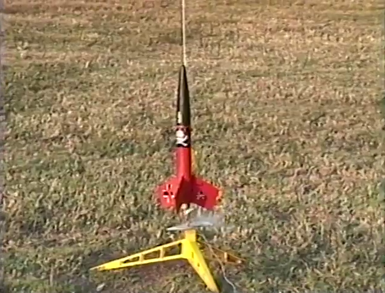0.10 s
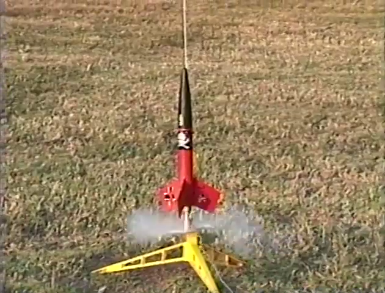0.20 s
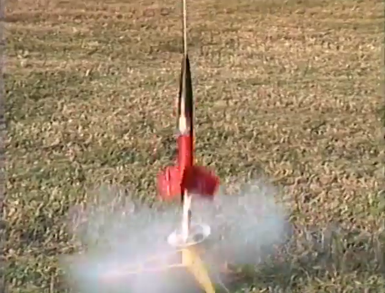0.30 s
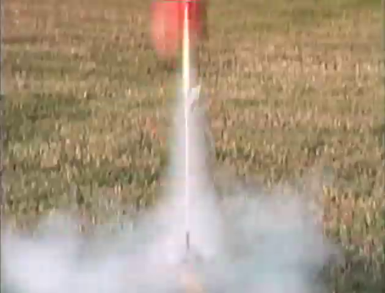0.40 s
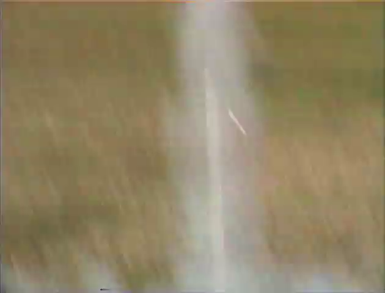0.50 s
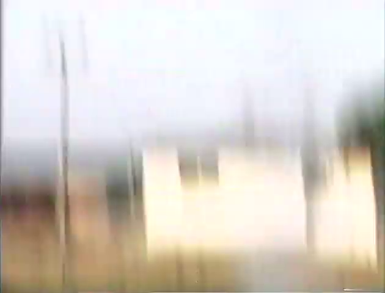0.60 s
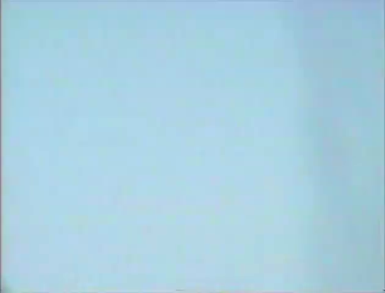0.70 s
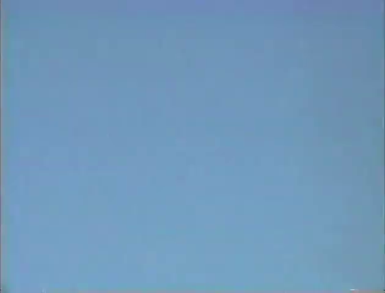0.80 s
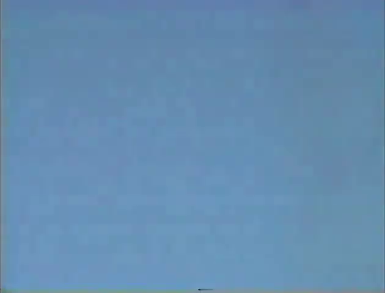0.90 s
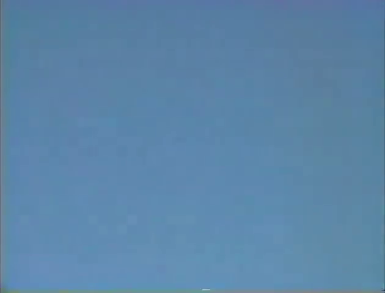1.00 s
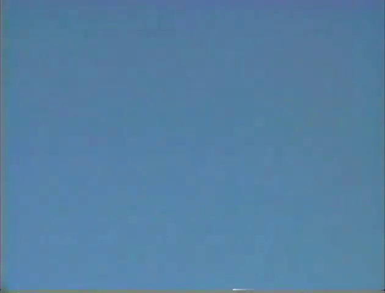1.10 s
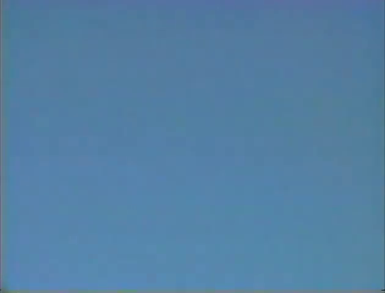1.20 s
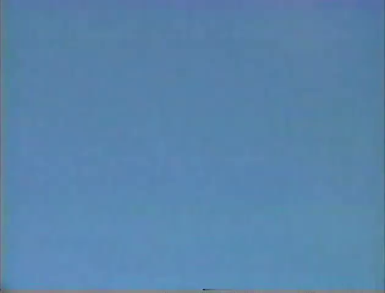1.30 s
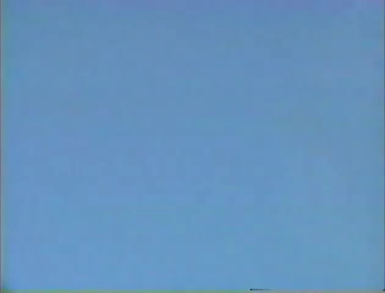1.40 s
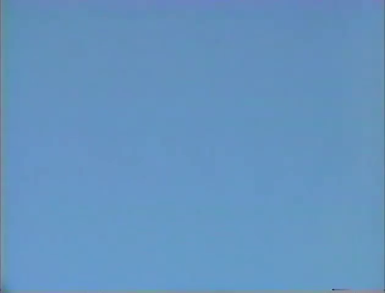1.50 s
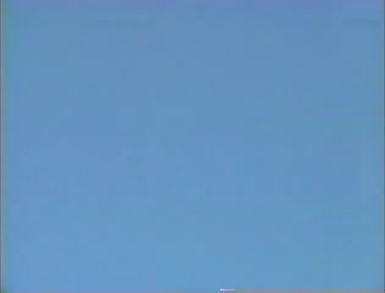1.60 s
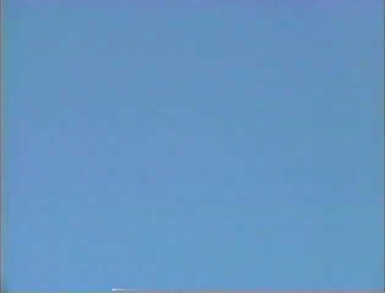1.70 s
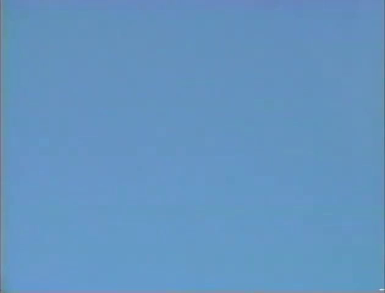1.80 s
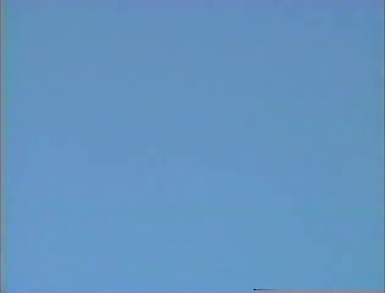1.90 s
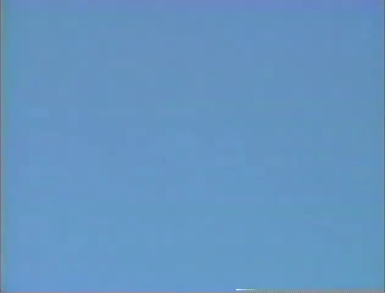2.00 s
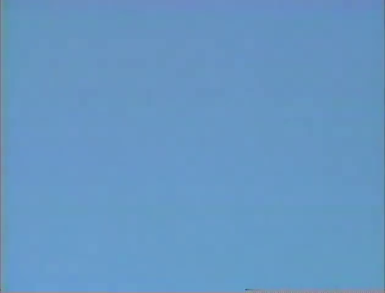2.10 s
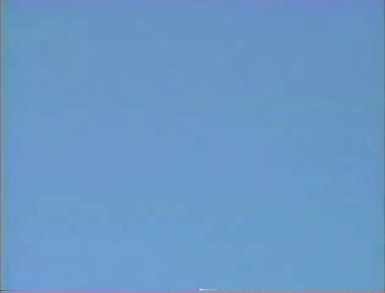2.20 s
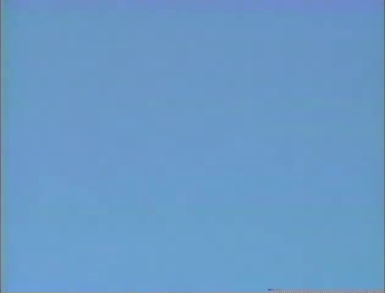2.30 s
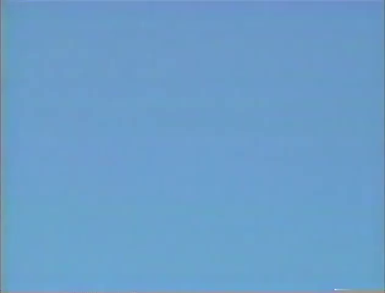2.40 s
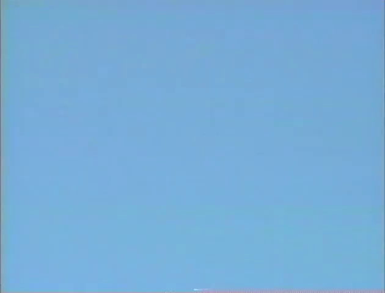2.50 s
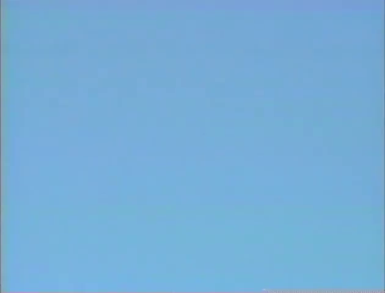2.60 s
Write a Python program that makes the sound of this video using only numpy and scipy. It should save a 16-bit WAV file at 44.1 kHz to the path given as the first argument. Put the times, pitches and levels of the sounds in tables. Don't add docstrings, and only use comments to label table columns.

```python
import sys
import numpy as np
from scipy import signal
from scipy.fft import rfft, irfft
from scipy.io import wavfile
from scipy.ndimage import uniform_filter1d

SR = 44100
rng = np.random.default_rng(int(sys.argv[2]) if len(sys.argv) > 2 else 0)


def wav_record(signal):
    frames = np.transpose(np.atleast_2d(signal))
    bounded = np.clip(frames, -1, 1)
    quanta = np.round(bounded * 32767).astype(np.int16)
    wavfile.write(sys.argv[1], SR, quanta)


def convert_level_to_amplitude(level_db):
    exponent = np.asarray(level_db, float) / 20
    return 10 ** exponent


N = 114660

# time in seconds, thrust as heard in dB, brightness from aim and height in dB,
# stereo spread in dB, body in dB.
BURN = [(0, -69.5, -11, 6, -1), (.105, -76, -13, 18, 2), (0.124, -51.5, -1.5, 3, 1.5),
        (.2, -37, -7.5, 2, -3), (0.306, -17.5, -10.5, 2.5, -5.5), (.325, -22.5, 0.5, 3, 0.5),
        (.365, -22, -0.5, 3, -5), (0.399, -21, -6.5, 4, 3), (.57, -22, -8, 4, 2), (.72, -22, -5, 4, 1),
        (.88, -24, -1, 6.5, -0.5), (1.15, -21.5, -9, 6, -2), (1.45, -24, -14, 7, 0),
        (2.001, -30, -14.5, 8, 2.5), (2.332, -33.5, -19.5, 8.5, 6), (2.369, -40.5, -20.5, 7, 11),
        (2.414, -58, -15, 24, 14), (2.46, -68.5, -14, 20, 9)]
THRUST, BRIGHTNESS, SPREAD, BODY = 1, 2, 3, 4

# frequency in Hz, level in dB per Hz.
JET_COLOUR = [(280, -28.5), (650, -11.5), (1300, -3), (3300, 5.5), (4300, -3.5), (9200, -4.5), (11000, -6),
              (15500, -11.5)]
JET_SIDE_COLOUR = [(250, -40), (1200, -31), (2300, -29), (3400, -20.5), (5000, -16), (9000, -18.5),
                   (12500, -20), (15500, -22.5)]

# place in Hz with the rocket ahead,
# place in Hz with it above, width in Hz, level in dB ahead, level in dB above.
NOTCHES = [(600, 1490, 153, 0.5, -2), (2160, 2144, 470, -12, -12), (4950, 4700, 980, -6.5, 1.4),
           (6200, 7010, 570, -25.5, -24), (11730, 10300, 460, -18.5, -5.5)]
NOTCHES_SIDE = [(2500, 2350, 350, -9, -9), (6200, 7000, 300, -8, -12), (11300, 11000, 300, -4, -6)]

# time in seconds, peak in dB, bluntness in Hz (higher is sharper).
CRACKS = [(0.3123, -10, 1250), (.3108, -18.5, 1600), (.3195, -26, 1210), (.36, -21, 1200),
          (.435, -21, 1110), (.55, -28, 1200), (.84, -18.5, 1500), (.870, -19.5, 1500), (.903, -16.5, 1500),
          (1.11, -27, 1500), (1.2789, -17.5, 1540), (1.5663, -20.5, 1510), (2.027, -28, 1500)]

# frequency in Hz, level in dB per Hz.
ECHO_COLOUR = [(150, 2), (400, 3), (1200, -9.5), (2200, -13), (3400, -10), (6500, -21), (10000, -28),
               (14000, -30)]

# time in seconds, level in dB.
POPS = [
    (2.4225, -28.5),
    (2.4288, -37.5),
    (2.496, -47.5),
]

# frequency in Hz, level in dB, time to fall by 60 dB in seconds.
POP_MODES = [(230, -12, .03), (470, -10, .01), (780, -2, .008), (2900, -1, .005), (4900, 5, .004),
             (6600, -8, .004), (9200, -5, .002), (12300, -5, .003), (14800, -10, .002)]

# multiple of the head rate, level in dB.
BUZZ = [(1, -59), (2, -51), (3, -44.5), (4, -53.5), (5, -55), (6, -53), (7, -68), (8, -70)]

# frequency in Hz, level in dB per Hz.
FIELD_COLOUR = [(15, -12.5), (25, -2.5), (103, -6), (468, -13.5), (796, -8.5), (2370, -33), (3180, -40.5),
                (13000, -46), (14500, -42)]


def rms_one(x):
    return x / np.sqrt(np.mean(x ** 2) + 1e-20)


def at_hz(points, hz):
    table_hz, table_db = np.array(points).T
    return np.interp(np.log(hz), np.log(table_hz), table_db)


def burn(column, s):
    rows = np.array(BURN)
    return np.interp(s, rows[:, 0], rows[:, column])


def seconds():
    return np.arange(N) / SR


def smooth(x, hz, kind="low"):
    return signal.sosfilt(signal.butter(2, hz, kind, fs=SR, output="sos"), x)


def balance(left_db, right_db):
    return convert_level_to_amplitude([[left_db], [right_db]])


def wide_noise(points):
    hz = np.maximum(np.fft.rfftfreq(N, 1 / SR), 20)
    return rms_one(irfft(rfft(rng.standard_normal((2, N))) * convert_level_to_amplitude(at_hz(points, hz)), N))


def all_around(pair):
    mid, side = pair
    return mid + side * convert_level_to_amplitude(-4) * [[1], [-1]]


def notch_db(table, hz, above):
    total = 0
    for ahead_hz, above_hz, width, ahead_db, above_db in table:
        total = total + ahead_db * (1 - above) * np.exp(-abs(hz - ahead_hz) / width)
        total = total + above_db * above * np.exp(-abs(hz - above_hz) / width)
    return total


def jet():
    frame = dict(nperseg=256, noverlap=192)
    sputter = convert_level_to_amplitude(1.0 * rms_one(smooth(rng.standard_normal(N), 370)))
    hz, s, (mid, other) = signal.stft(rng.standard_normal((2, N)) * sputter, SR, **frame)
    hz = np.maximum(hz, 1)[:, None]
    overhead_start_s, overhead_end_s = 0.51, 0.91
    above = np.clip((s - overhead_start_s) / (overhead_end_s - overhead_start_s), 0, 1)
    brightness = burn(BRIGHTNESS, s)

    bright_from_hz, bright_full_hz, body_below_hz = 4240, 7870, 2400
    top = np.clip((hz - bright_from_hz) / (bright_full_hz - bright_from_hz), 0, 1)
    body = 1 / (1 + (hz / body_below_hz) ** 6)
    edge_hz, edge_width_hz, edge_db_per_s, edge_from_s = 15400, 1200, -16, 0.67
    edge_shape = np.exp(-((hz - edge_hz) / edge_width_hz) ** 2)
    edge_db = edge_db_per_s * np.maximum(s - edge_from_s, 0) * edge_shape
    patches = uniform_filter1d(rng.standard_normal(mid.shape), size=16, axis=1)
    flicker_db = 0.62 * rms_one(uniform_filter1d(patches, size=6, axis=0))
    common_db = burn(THRUST, s) + (brightness + 5) * top + burn(BODY, s) * body
    common_db = common_db + edge_db + flicker_db + 9.5

    late_share, late_phase = 0.52, 1.83
    side = late_share * np.exp(1j * late_phase) * mid + np.sqrt(1 - late_share ** 2) * other
    side_db = burn(SPREAD, s) + at_hz(JET_SIDE_COLOUR, hz) + notch_db(NOTCHES_SIDE, hz, above)
    side = side * convert_level_to_amplitude(common_db + side_db)

    wander = 0.13 * rms_one(uniform_filter1d(rng.standard_normal(len(s)), size=60))
    depth = 1 - 0.04 * np.clip(brightness + 6, 0, 12) + wander
    mid = mid * convert_level_to_amplitude(common_db + at_hz(JET_COLOUR, hz) + notch_db(NOTCHES, hz, above) * depth)
    pair = signal.istft(np.array([mid + side, mid - side]), SR, **frame)[1][:, :N]
    return pair * balance(-0.8, 0.8)


def crackle():
    s = seconds()
    shocks_per_s, size_spread_db, shared = 200, 1.7, 0.14
    sizes = convert_level_to_amplitude(size_spread_db * np.minimum(rng.exponential(1, (2, N)), 4))
    shocks = sizes * (rng.random((2, N)) < shocks_per_s / SR)
    shocks = shocks + shared * shocks[::-1] + 1e-18
    dense = -smooth(smooth(shocks, 960), 90, "high")
    level_db = -48.5 + 1.34 * (burn(THRUST, s) + 22.5) + 0.71 * (burn(BRIGHTNESS, s) + 17)
    out = rms_one(dense) * convert_level_to_amplitude(level_db)
    for at, db, hz in CRACKS:
        out = out - convert_level_to_amplitude(db) * np.exp(-((s - at) * np.pi * hz) ** 2)
    return smooth(out, 22, "high") * balance(-6, 3)


def far_echo():
    start_s, rise_s = 0.54, 0.34
    rise = np.clip((seconds() - start_s) / rise_s, 0, 1)
    return all_around(wide_noise(ECHO_COLOUR) * convert_level_to_amplitude(-58.5) * rise)


def pop():
    out = 0
    for k, (hz, db, t60) in enumerate(POP_MODES):
        swell_s = min(0.8 / hz, 0.002)
        direct, echoes = np.full((2, N), 1e-18)
        for n, (s, pop_db) in enumerate(POPS):
            clicks = direct if n == 0 else echoes
            clicks[int((s + swell_s) * SR)] = convert_level_to_amplitude(pop_db)
        r = convert_level_to_amplitude(-60 / (t60 * SR))
        w = 2 * np.pi * hz / SR
        struck = direct + smooth(echoes, 2480)
        ring = signal.lfilter([0, convert_level_to_amplitude(db) * np.sin(w)], [1, -2 * r * np.cos(w), r * r], struck)
        right = -0.15 if k in (4, 6, 7, 8) else 1
        out = out + ring * (-1) ** (k + 1) * balance(-1.5, 1.5) * np.array([[1], [right]])
    return out


def tape():
    s = seconds()
    swell = uniform_filter1d(burn(THRUST, s) + 20, size=2000)
    brightness = burn(BRIGHTNESS, s)

    head_hz = 29.5
    buzz = sum(convert_level_to_amplitude(db + 3) * np.sin(2 * np.pi * (head_hz * k * s + rng.random())) for k, db in BUZZ)
    wobble_db = 1.5 * rms_one(smooth(rng.standard_normal(N), 10))
    buzz = buzz * convert_level_to_amplitude(0.57 * swell + 0.25 * (brightness + 7) + wobble_db) * balance(-2, 2)

    noise = smooth(smooth(rng.standard_normal((2, N)), 40), 10, "high")
    rumble = rms_one(noise + noise[::-1] * 0.32) * balance(-2.5, 2.5)
    rumble = rumble * convert_level_to_amplitude(-44 + 0.43 * swell + 0.51 * (brightness + 10))

    whine = convert_level_to_amplitude(-56) * np.sin(2 * np.pi * 15734 * s)
    return buzz + rumble + whine


def field():
    return all_around(wide_noise(FIELD_COLOUR) * convert_level_to_amplitude(-56))


def scene():
    return jet() + crackle() + far_echo() + pop() + tape() + field()


def roll_off(x):
    return signal.sosfilt(signal.butter(12, 16810, fs=SR, output="sos"), x)


def record(dry):
    steep = signal.ellip(10, 0.5, 80, 15900, fs=SR, output="sos")
    finished = signal.sosfilt(steep, dry)
    return roll_off(finished)


dry = scene()
out = record(dry)
wav_record(out)
```